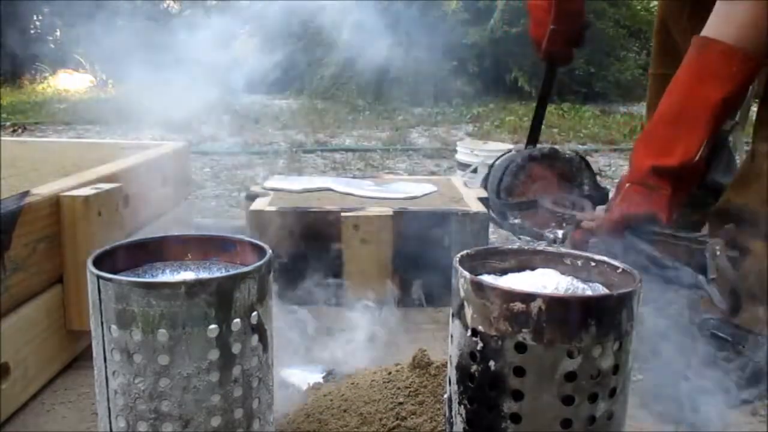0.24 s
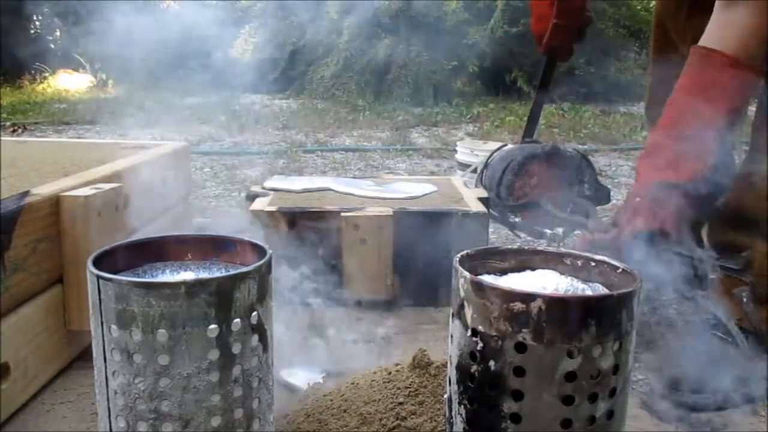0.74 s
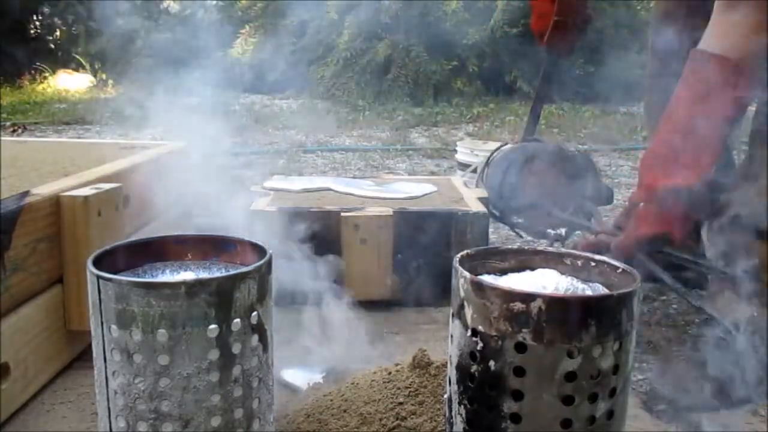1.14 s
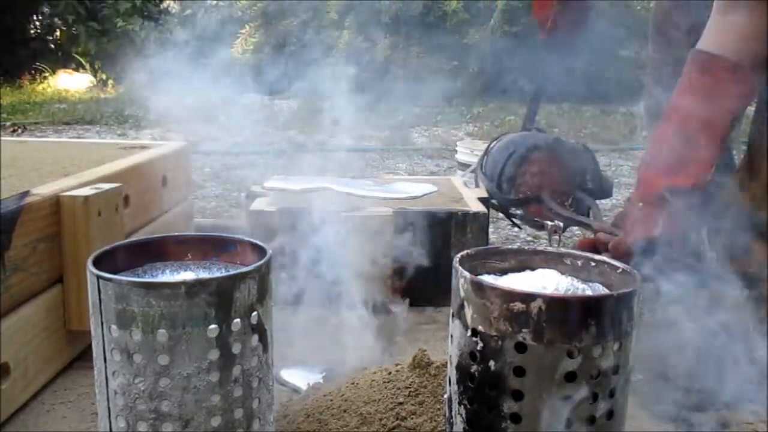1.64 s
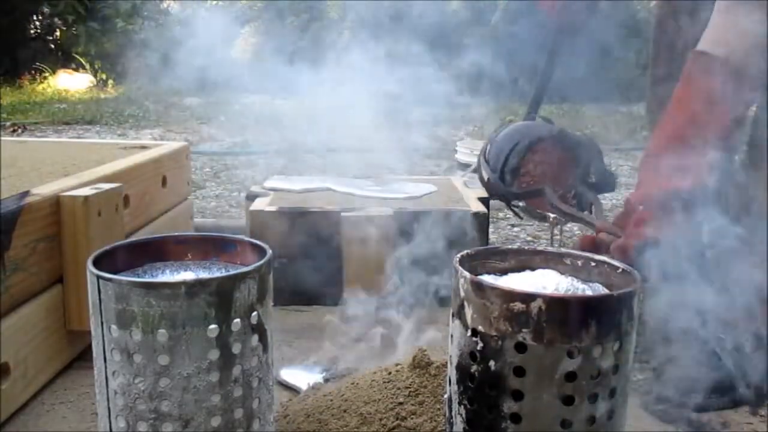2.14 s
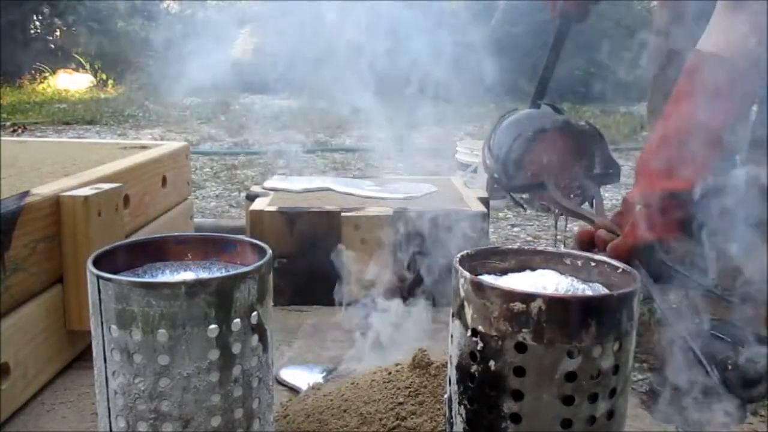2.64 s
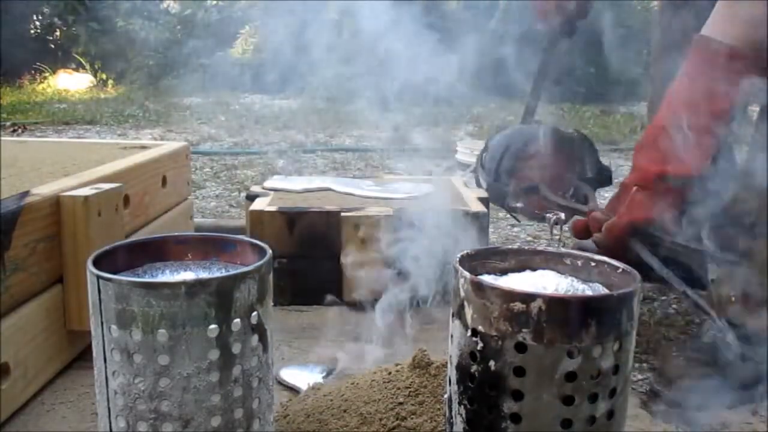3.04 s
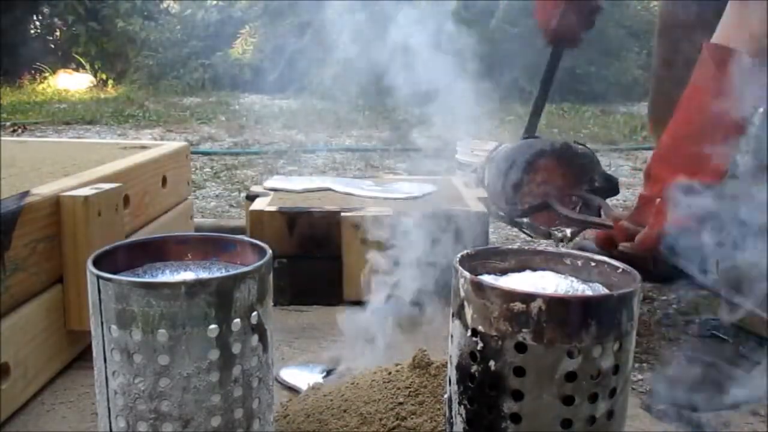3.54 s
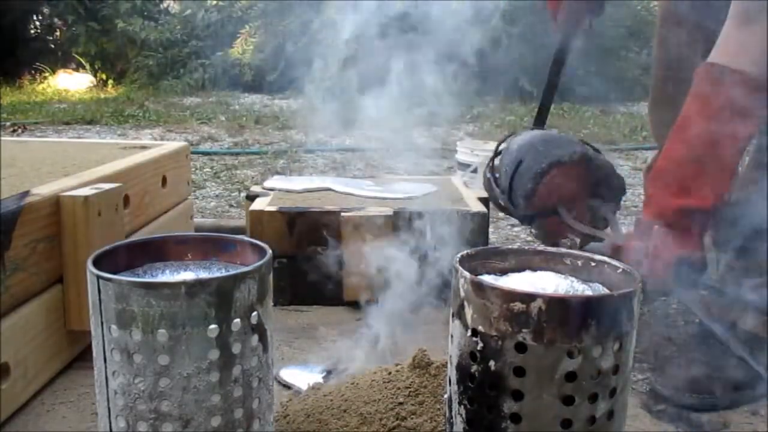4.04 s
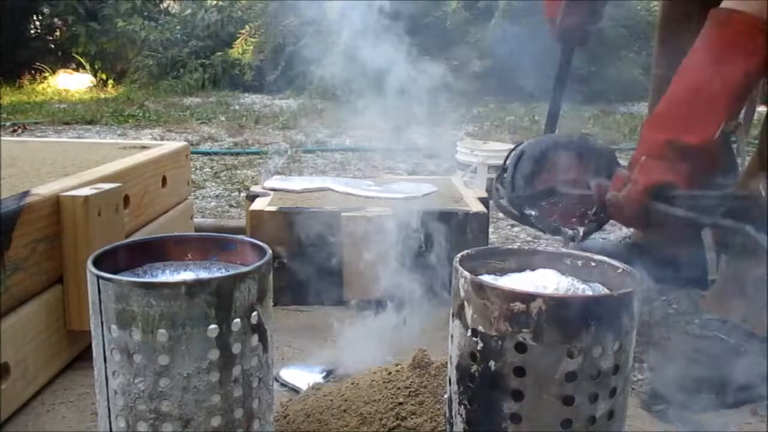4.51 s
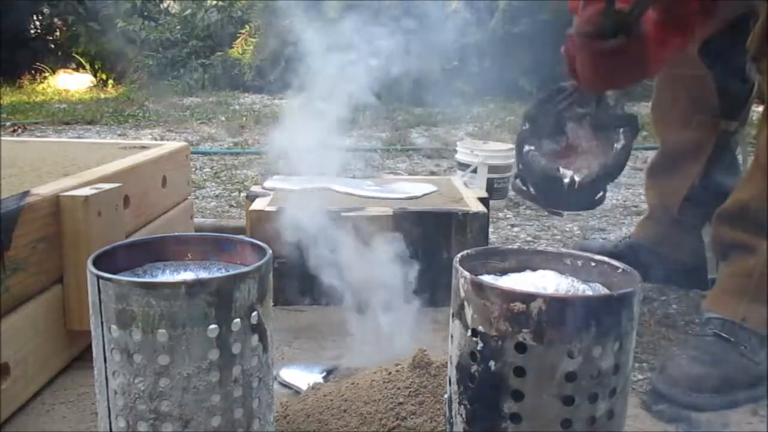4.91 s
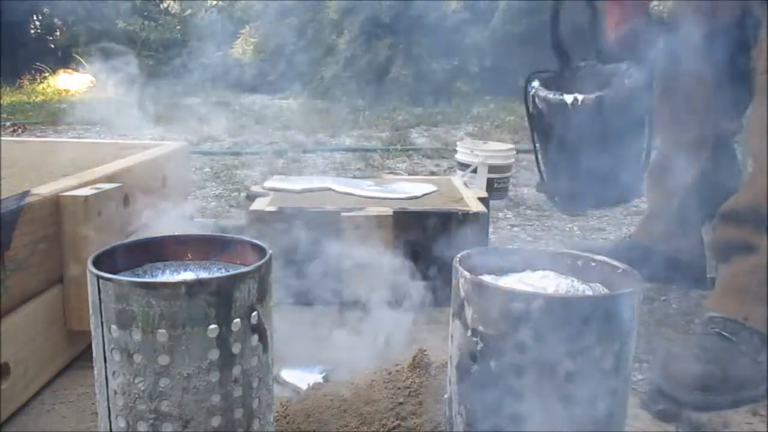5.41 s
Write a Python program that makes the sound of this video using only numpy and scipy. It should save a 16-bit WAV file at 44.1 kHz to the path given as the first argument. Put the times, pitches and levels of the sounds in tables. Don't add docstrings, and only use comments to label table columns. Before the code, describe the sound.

In a back yard, a propane burner roars without pause close to a small camera. The hollow, low-mid roar flutters quickly as the flame surges and sags, with a wavering breathy tube tone and light hiss above. Hard puffs thump around half a second, 2.4, 3.1 and 4.7 seconds, the level dipping after them. Faint wood ticks and one tiny late tong clink barely show.

```python
import sys
import numpy as np
from scipy import signal
from scipy.fft import rfft, irfft, next_fast_len
from scipy.io import wavfile
from scipy.ndimage import uniform_filter1d, map_coordinates

SR = 44100
rng = np.random.default_rng(int(sys.argv[2]) if len(sys.argv) > 2 else 0)


def decibels_to_gain(level_db):
    exponent = np.asarray(level_db, float) / 20
    return 10 ** exponent


def to_wav(s):
    ch = np.atleast_2d(s).T
    pcm = np.round(np.clip(ch, -1, 1) * 32767)
    wavfile.write(sys.argv[1], SR, pcm.astype(np.int16))


N = 250047
ROAR_DB, HUM_DB, VENT_DB, SONG_DB, JET_DB = -17.5, -20.5, -20.5, -29, -38


def noise():
    return rng.standard_normal(N)


def butter(x, order, hz, kind):
    return signal.sosfilt(signal.butter(order, hz, kind, fs=SR, output="sos"), x)


def resonate(x, hz, width_hz):
    return signal.lfilter(*signal.iirpeak(hz, hz / width_hz, SR), x)


def colour(points):
    hz, db = np.transpose(points)
    f_hz = np.maximum(np.arange(N // 2 + 1) * SR / N, 1)
    shape_db = np.interp(np.log(f_hz), np.log(hz), db)
    x = irfft(rfft(noise()) * decibels_to_gain(shape_db), N)
    return x / x.std()


def walk(rate_hz):
    hold = int(SR / rate_hz)
    held = np.repeat(rng.standard_normal(N // hold + 1), hold)
    slewed = uniform_filter1d(uniform_filter1d(held, hold), hold)
    return 0.66 * slewed[:N]


def ring(x, modes, flicker_db, rate_hz):
    y = np.zeros(N)
    for hz, width_hz, db in modes:
        y += decibels_to_gain(db + flicker_db * walk(rate_hz)) * resonate(x, hz, width_hz)
    return y / y.std()


def steady(x, span_s, share):
    span = int(span_s * SR)
    power = uniform_filter1d(uniform_filter1d(x ** 2, span), span)
    return x / power ** (share / 2)


def waver(x, share, rate_hz):
    bend = share * walk(rate_hz)
    path = np.arange(N) + np.cumsum(bend - bend.mean())
    return map_coordinates(x, [np.clip(path, 0, N - 1)], order=3)


def bumps(events):
    t = np.arange(N) / SR
    return sum(db * np.exp(-((t - s) / length_s) ** 2) for s, db, length_s in events)


# frequency in Hz, width in Hz, level in dB.
CAVITY_MODES = [(200.3, 11, -5), (236.3, 31, 0.5), (249.8, 73, -5.5)]
# centre in seconds, level in dB, length in seconds.
FLAME_FLARES = [(.09, -3.5, .03), (.16, 5, 0.022), (.2, -5, 0.023), (.36, 3.5, 0.056), (.61, -3.5, 0.027),
                (.67, 4, 0.035), (.78, -10, 0.032), (1.17, 4, 0.037), (1.27, -6, 0.04), (1.89, -1.5, 0.063),
                (2.1, 3.5, 0.067), (2.35, 2, 0.023), (2.69, 4.5, .04), (3.12, 5, 0.019), (3.2, -6.5, 0.029),
                (3.35, -5, 0.033), (3.8, -5, 0.023), (3.97, -3, .025), (4.24, 2.5, 0.046), (4.6, 2.5, .03),
                (4.69, -2, .015), (4.76, 5.5, 0.018), (5.3, 6, 0.021), (5.62, 3, .05)]


def cavity_roar():
    flame = butter(noise(), 3, 160, "high")
    roar = butter(ring(flame, CAVITY_MODES, flicker_db=0.55, rate_hz=2), 4, 330, "low")
    return decibels_to_gain(ROAR_DB + 1.3 + bumps(FLAME_FLARES)) * steady(roar, 0.064, 1.0)


# centre in seconds, level in dB, length in seconds.
HUM_SWELLS = [(.07, 3.5, .05), (.45, 7, 0.24), (.85, 7, 0.019), (1.1, 5, 0.13), (1.31, 6.5, 0.056),
              (1.7, 7, .13), (2.12, 6, .08), (2.36, 6, .05), (2.88, 5.5, 0.14), (3.08, 7, 0.072),
              (3.24, 5.5, .04), (3.52, 9.5, 0.033), (3.75, 4, 0.091), (3.94, 3.5, .04), (4.15, 8.5, 0.042),
              (4.48, 3.5, 0.027), (4.64, 5, 0.19), (5.12, 3, 0.071), (5.5, 6.5, 0.072)]


def hum():
    hz, width_hz = 316, 26
    tone = signal.filtfilt(*signal.iirpeak(hz, hz / width_hz, SR), noise())
    return decibels_to_gain(HUM_DB - 0.53 + bumps(HUM_SWELLS)) * steady(tone / tone.std(), 0.066, 0.86)


# centre in seconds, level in dB, length in seconds.
GAS_GUSTS = [(.11, -0.5, .03), (.43, 4, 0.058), (1.27, 2, 0.057), (1.78, 0.5, .05), (2.32, 1.5, 0.044),
             (3.08, 2.5, .04), (3.77, 1.5, 0.047), (3.87, 3.5, 0.023), (4.14, 1, .012), (4.31, 2, .03),
             (4.55, 2, 0.16), (5.12, 2, .03), (5.24, 3.5, .03), (5.6, 0.5, .04)]


def gusts_db():
    return bumps(GAS_GUSTS)


# frequency in Hz, width in Hz, level in dB.
VENT_MODES = [(386, 16, -7.5), (404.5, 54, 5.5), (457, 42, 3.5), (499.4, 99, -15.5), (574, 50, -13.5),
              (706, 240, -8)]
# centre in seconds, level in dB, length in seconds.
VENT_DRAUGHTS = [(.3, 0.5, .1), (1.0, 1.5, 0.061), (1.3, 1.5, 0.07), (1.62, 1, .1), (2.1, 1, .1),
                 (3.85, 2.5, 0.31), (4.2, -2.5, 0.096), (5.2, 0, .15)]


def vent_roar(gust_db):
    vent = butter(ring(noise(), VENT_MODES, flicker_db=1.8, rate_hz=3.7), 3, [340, 680], "band")
    flow_db = 0.27 * gust_db + bumps(VENT_DRAUGHTS)
    return decibels_to_gain(VENT_DB + 0.23 + flow_db) * steady(vent, 0.31, 0.75)


# frequency in Hz, width in Hz, level in dB.
TUBE_MODES = [(846, 37, -35), (933.6, 50, 4.5), (1011, 51, 0.5), (1329, 90, 3), (1366, 67, -2.5),
              (1460, 150, -13.5), (2070, 107, 3), (2050, 390, -13)]


def tube_song(gust_db):
    song = butter(ring(noise(), TUBE_MODES, flicker_db=1.5, rate_hz=7.8), 2, [700, 2600], "band")
    return decibels_to_gain(SONG_DB - 1.5 + gust_db) * steady(waver(song, 0.01, 3), 0.089, 0.44)


# frequency in Hz, width in Hz, level in dB.
BELLY_MODES = [(91.4, 35, -4), (125.5, 20, -5), (156, 62, 8)]
# frequency in Hz, width in Hz, level in dB.
NOZZLE_MODES = [(2978, 94, 7.5), (3663, 240, -1.5), (3860, 95, -11.5), (4040, 113, -3.5), (4256, 270, -8),
                (4437, 63, 0.5), (4850, 180, -41), (5160, 63, -7.5), (6015, 100, -11), (6310, 420, -20.5),
                (6930, 140, -11), (7770, 210, -20.5), (9130, 170, -24.5), (11200, 210, -14.5)]
# frequency in Hz, level in dB per Hz.
JET_RUSH = [(25, -16), (55, 8), (300, 2), (800, 2.5), (1800, 4.5), (2500, -13), (3400, -11.5), (5000, -21),
            (5700, -19), (8000, -16), (12300, -19.5), (12450, -19), (15700, -23.5), (17000, -19)]


def gas_jet():
    belly = butter(ring(noise(), BELLY_MODES, flicker_db=0.93, rate_hz=15.0), 3, [85, 200], "band")
    whistle = butter(ring(noise(), NOZZLE_MODES, flicker_db=1.3, rate_hz=14), 2, 2300, "high")
    jet = decibels_to_gain(17.5) * belly + decibels_to_gain(0.13) * waver(whistle, 0.003, 5) + decibels_to_gain(5.0) * colour(JET_RUSH)
    return decibels_to_gain(JET_DB) * jet


def burner():
    gust_db = gusts_db()
    return cavity_roar() + hum() + vent_roar(gust_db) + tube_song(gust_db) + gas_jet()


# start in seconds, drop in dB.
GAIN_DUCKS = [(.12, 2), (0.491, 2.5), (1.298, 1), (2.37, 1.5), (3.104, 2), (3.92, 0), (4.673, 4)]


def camera_gain_db():
    t, recover_s = np.arange(N) / SR, 0.76
    gain_db = np.zeros(N)
    for s, drop_db in GAIN_DUCKS:
        gain_db -= drop_db * (t > s) * np.exp(-np.maximum(t - s, 0) / recover_s)
    return gain_db


# time in seconds, frequency in Hz.
FLAME_FRONT = [(0, 1350), (.3, 1340), (.5, 1408), (1.05, 1430), (1.3, 1366), (1.8, 1420), (2.201, 1358),
               (3.05, 1285), (3.4, 1364), (3.9, 1350), (4.4, 1312), (4.75, 1300), (5.67, 1310)]


def slide(x):
    rest_hz = 1350
    sos = signal.butter(3, [1010, 1680], "band", fs=SR, output="sos")
    band = signal.sosfiltfilt(sos, x)
    shift_hz = np.interp(np.arange(N) / SR, *np.transpose(FLAME_FRONT)) - rest_hz
    analytic = signal.hilbert(band, next_fast_len(N))[:N]
    return x - band + np.real(analytic * np.exp(2j * np.pi * np.cumsum(shift_hz) / SR))


# frequency in Hz, width in Hz, depth from 0 to 1.
REFLECTION_HOLLOWS = [(281.4, 6.3, 0.5), (343, 14, 0.36), (410, 24, 0.27), (828, 45, 0), (1130, 69, 0.06),
                      (1762, 150, 0.66), (2460, 760, 0.42), (3580, 220, 0), (5480, 660, 0.2)]


def reflections(x):
    for hz, width_hz, depth in REFLECTION_HOLLOWS:
        x = x - np.clip(depth, 0, 1) * resonate(x, hz, width_hz)
    return x


# centre in seconds, frequency in Hz, level in dB, length in seconds.
STRONG_PUFFS = [(.4825, 250, -4, .004), (2.362, 250, -4, .004), (3.098, 260, -1.5, .004),
                (4.6693, 275, -.3, .005)]


def puffs(x):
    t = np.arange(N) / SR
    low = signal.sosfiltfilt(signal.butter(2, 500, fs=SR, output="sos"), x)
    for s, hz, db, length_s in STRONG_PUFFS:
        cycle = decibels_to_gain(db) * np.cos(2 * np.pi * hz * (t - s))
        x = x - np.exp(-((t - s) / length_s) ** 2) * (low + cycle)
    return x


# centre in seconds, level in dB.
WOOD_SPITS = [(.5289, -37), (.9951, -34), (3.2952, -40)]


def spits():
    t = np.arange(N) / SR
    shape = sum(decibels_to_gain(db) * np.exp(-((t - s) / 0.00055) ** 2) for s, db in WOOD_SPITS)
    return shape * colour([(4000, -30), (6500, -4), (8500, -6), (11500, 0), (14500, -12)])


# start in seconds, level in dB.
TONG_TAPS = [(5.226, -40), (5.237, -45.5)]
# frequency in Hz, level in dB, 60 dB decay in seconds.
TONG_MODES = [(6300, 5, 0.038), (8699, -2, .08), (11700, -6, .04), (12800, -3, 0.042)]


def tongs():
    out, t = np.zeros(N), np.arange(SR // 8) / SR
    tap = sum(decibels_to_gain(db - 60 * t / t60_s) * np.sin(2 * np.pi * hz * t) for hz, db, t60_s in TONG_MODES)
    for s, db in TONG_TAPS:
        out[int(s * SR):][:len(t)] += decibels_to_gain(db) * tap
    return out


def scene():
    x = reflections(slide(decibels_to_gain(camera_gain_db()) * burner()))
    return (puffs(x) + spits() + tongs())[None]


# centre of the first block in seconds, blocks in a row, step in dB, highest
# surviving line in Hz.
STARVED_BLOCKS = [(.187, 1, -27, 6503), (.5063, 1, -25, 5254), (.6132, 1, -28, 6912), (.7836, 1, -28, 6998),
                  (.8666, 1, -27, 7084), (1.3175, 1, -27, 8333), (1.4243, 2, -26, 7040),
                  (1.8505, 1, -27, 7493), (1.8932, 1, -26, 7062), (2.8953, 1, -27, 8785),
                  (3.1106, 1, -27, 4600), (3.1730, 2, -27, 7924), (3.2589, 1, -28, 5211),
                  (4.1967, 1, -25, 7127), (4.8589, 1, -29, 10680), (5.115, 1, -27, 7062),
                  (5.5834, 1, -28, 4500)]


def starve(x):
    size = 941
    n, k = np.arange(2 * size) + 0.5, np.arange(size) + 0.5
    window = np.sin(np.pi * n / (2 * size))
    basis = np.sqrt(2 / size) * window * np.cos(np.pi / size * np.outer(k, n + size / 2))
    masked_db = 6 * np.log2(5000 / np.clip(k * SR / 2 / size, 1500, 5000))
    out = x.copy()
    for s, blocks, step_db, top_hz in STARVED_BLOCKS:
        top = int(top_hz * 2 * size / SR)
        step = decibels_to_gain(step_db + masked_db)
        for b in range(int(round(blocks))):
            start = int(s * SR) + (b - 1) * size
            span = slice(start, start + 2 * size)
            lines = basis @ x[span]
            steps = np.floor(np.abs(lines / step) ** 0.75 + 0.4)
            steps[top], steps[top + 1:] = 1, 0
            out[span] += (np.sign(lines) * step * steps ** (4 / 3) - lines) @ basis
    return out


def band_limit(x):
    return signal.sosfilt(signal.butter(12, 15730, fs=SR, output="sos"), x)


def record(dry):
    knee, headroom = 0.8, 0.19
    over = np.maximum(np.abs(dry[0]) - knee, 0)
    rounded = dry[0] - np.sign(dry[0]) * (over - headroom * np.tanh(over / headroom))
    mix = starve(rounded)[None]
    return band_limit(mix)


dry = scene()
out = record(dry)
to_wav(out)
```